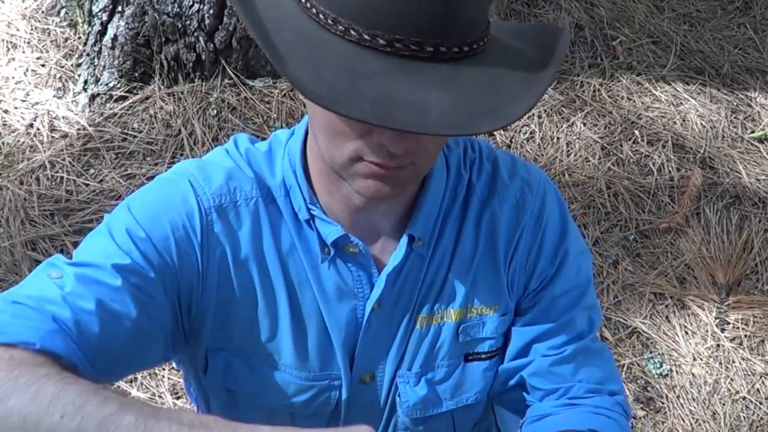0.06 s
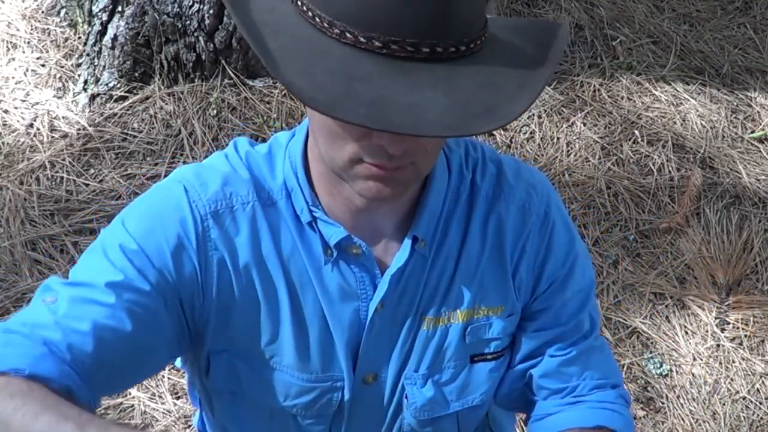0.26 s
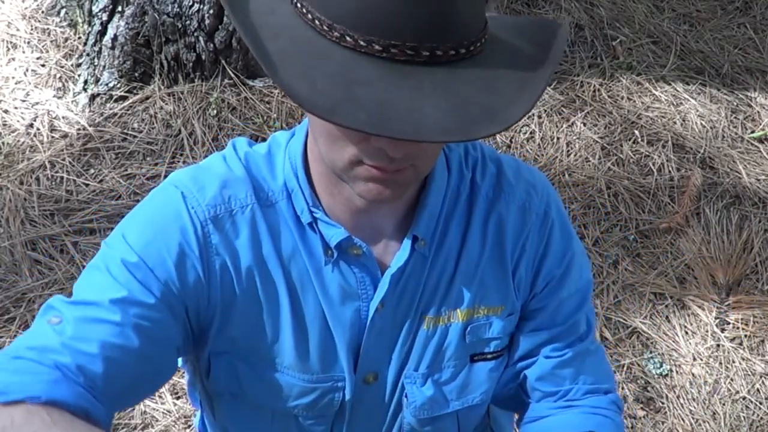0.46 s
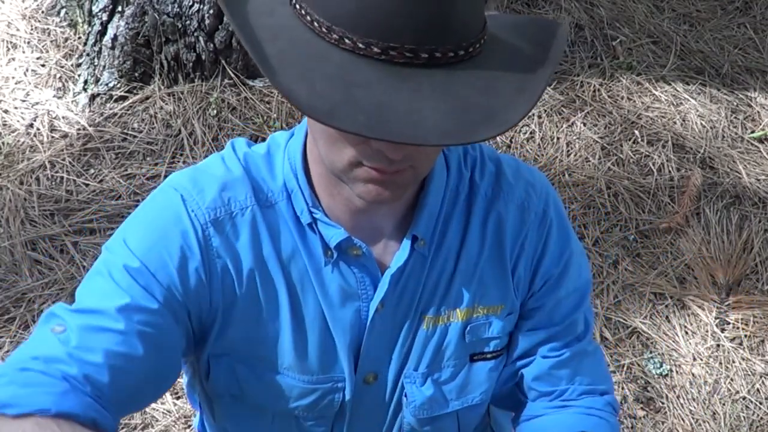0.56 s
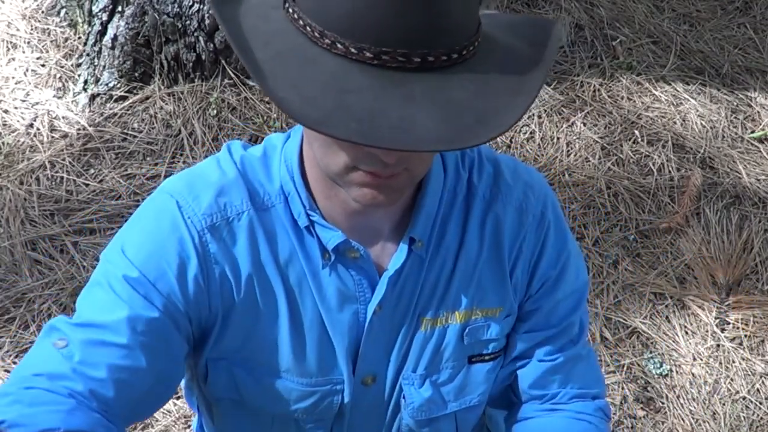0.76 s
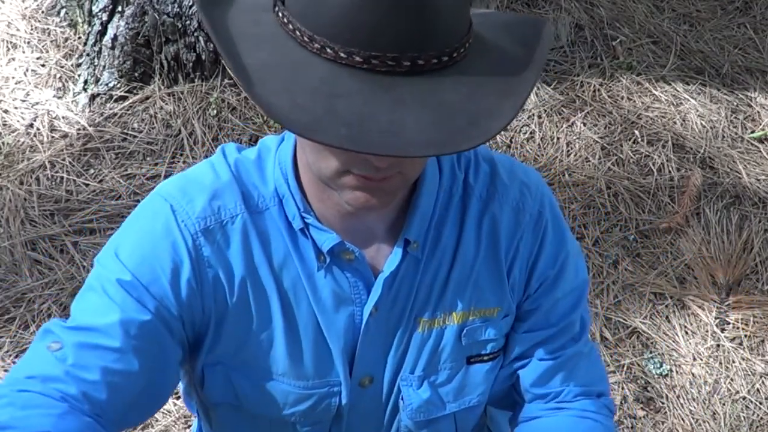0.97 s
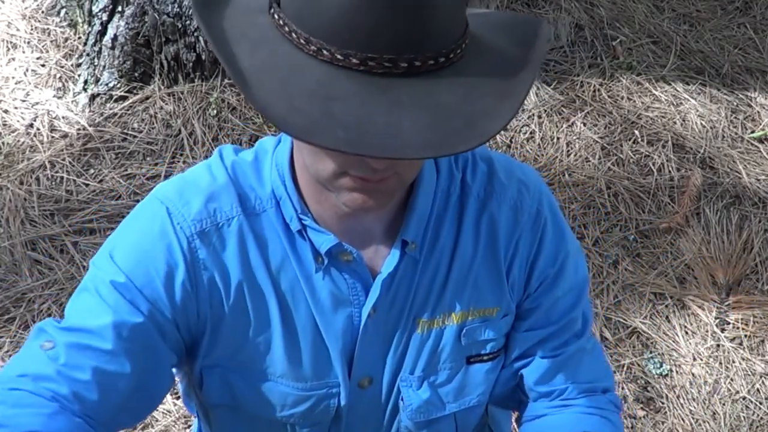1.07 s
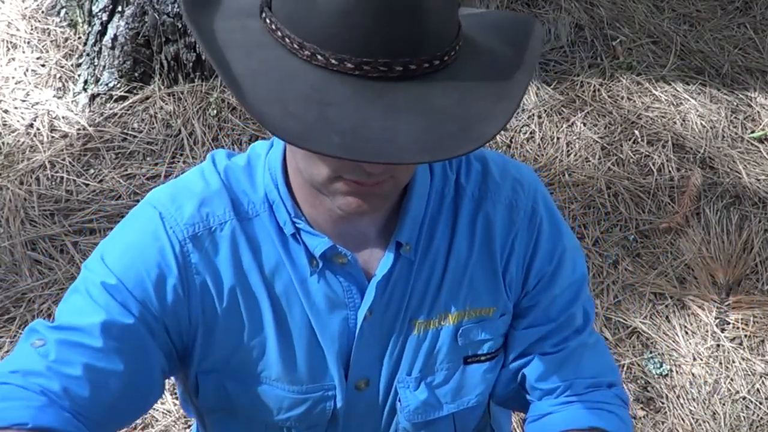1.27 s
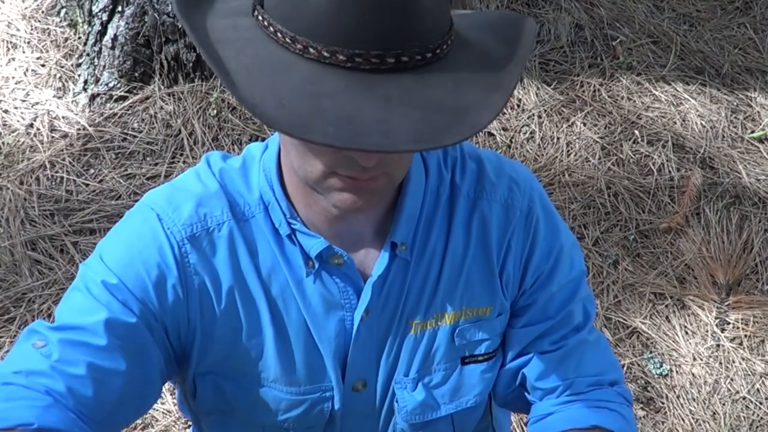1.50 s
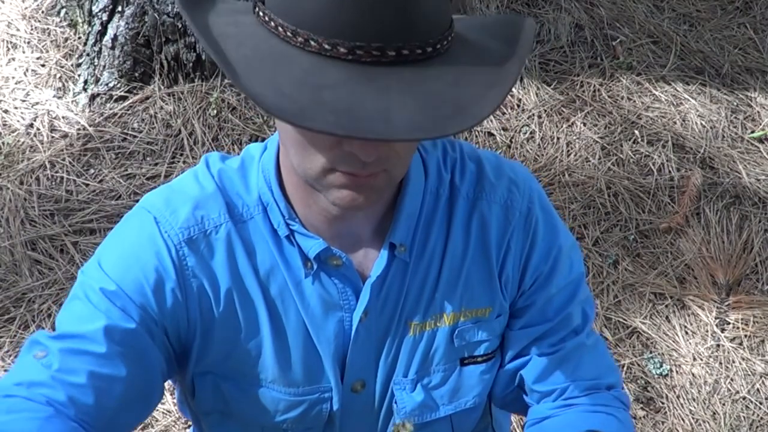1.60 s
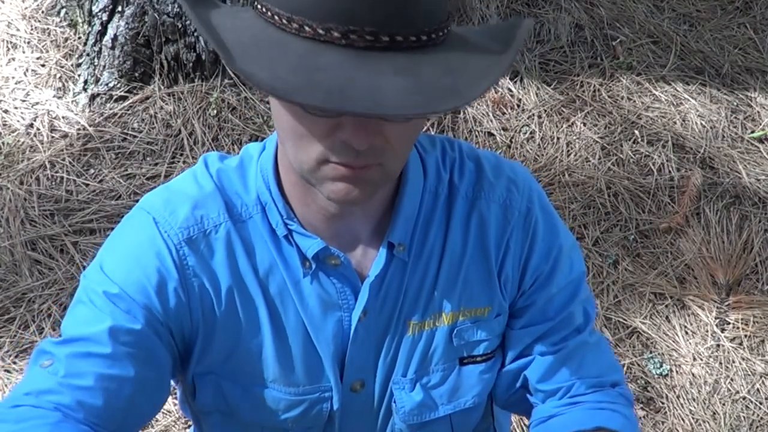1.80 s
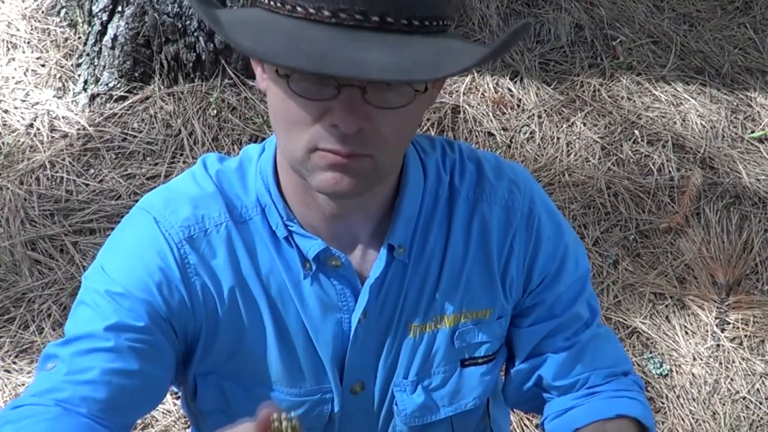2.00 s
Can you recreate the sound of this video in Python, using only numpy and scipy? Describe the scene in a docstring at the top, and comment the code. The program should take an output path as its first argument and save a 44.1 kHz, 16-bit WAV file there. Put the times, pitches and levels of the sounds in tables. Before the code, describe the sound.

Close metal hardware handling outdoors: quick bright clinks, a sharp ringing one midway, then fainter clicks and rustling of rope and sleeve, over a low airy hush with faint insect hiss and a brief distant chirp.

```python
"""Outdoors, close to a camera's stereo microphone, a brass ring and a snap hook are handled on a rope.
The ring chimes in three split pairs of decaying tones, the snap in short, mostly high tones with clicks.
Noise grains make the rustle of rope and sleeve, and short noise bursts the dull finger taps. Behind are
a low wash and two insect bands of filtered noise, a far bird's chopped tones and a thin steady line tone."""
import sys
import numpy as np
from scipy import signal
from scipy.fft import rfft, irfft
from scipy.io import wavfile
from scipy.ndimage import uniform_filter1d

SR = 44100
rng = np.random.default_rng(int(sys.argv[2]) if len(sys.argv) > 2 else 0)


def inscribe(sig):
    """Save sig as 16-bit PCM at rate SR to the path in sys.argv[1].

    A 1-D sig is mono; a 2-D sig holds one channel per row.
    Samples are clipped to [-1, 1] before scaling.
    """
    pcm = np.round(np.clip(np.atleast_2d(sig).T, -1, 1) * 32767)
    wavfile.write(sys.argv[1], SR, pcm.astype(np.int16))


def volts_from_decibels(level):
    """Turn decibel levels (scalar or array-like) into linear amplitude factors."""
    exponent = np.asarray(level, float) / 20
    return 10 ** exponent


N = 90404  # length in samples


def shape(x, points):
    """Colour a sound by (frequency [Hz], gain [dB]) points, joined along a logarithmic pitch scale."""
    hz, db = np.array(points, float).T
    bins_hz = np.fft.rfftfreq(x.shape[-1], 1 / SR)
    gain_db = np.interp(np.log(bins_hz + 1), np.log(hz), db)
    return irfft(rfft(x) * volts_from_decibels(gain_db), x.shape[-1])


def level(x, db):
    """Set the average (rms) level in dB."""
    return x * volts_from_decibels(db) / np.sqrt(np.mean(x ** 2))


def walk(rate):
    """Smooth random wandering with spread 1: noise averaged twice over 1 / rate seconds."""
    width = max(int(SR / rate), 1)
    smooth = uniform_filter1d(uniform_filter1d(rng.standard_normal(N), width), width)
    return level(smooth, 0)


def fade(t, t60, rise=0.00033):
    """A short rise for the contact time [s], then an exponential decay by 60 dB in t60 seconds."""
    return (1 - np.exp(-t / rise)) * np.exp(-np.log(1000) * t / t60)


def add(out, start_s, sound):
    """Mix a sound in at its start time, cutting off what runs past the end."""
    i = int(round(start_s * SR))
    out[i:i + len(sound)] += sound[:max(len(out) - i, 0)]


def outdoors():
    """A wide noise wash, most alike left and right in the low bass, with two wavering insect bands."""
    # colour of the wash: (frequency [Hz], gain [dB])
    wash_colour = [(20, -20), (50, -4.5), (105, -2), (340, -2), (670, -4.5), (1200, -10.5), (2000, -14),
                   (3500, -15.5), (5200, -16), (8000, -25.5), (11000, -24), (14000, -52), (16000, -59.5)]
    # its left-right difference against its shared part: (frequency [Hz], gain [dB])
    side_colour = [(25, -24), (60, -15), (125, -10), (250, -4), (500, -2.2), (1000, 2), (2000, 1.5),
                   (4000, -2), (8000, 1), (14000, -24)]
    # insect bands: (centre [Hz], half the skirt width [Hz], level of the shared part [dB], waver rate [1/s])
    insect_bands = [(2520, 130, -72, 33), (6420, 1700, -66.5, 70)]
    mid, side = shape(rng.standard_normal((2, N)), wash_colour)
    wash_gain = volts_from_decibels(-56) / np.sqrt(np.mean(mid ** 2))
    mid = wash_gain * mid
    side = wash_gain * shape(side, side_colour)
    for hz, width, db, rate in insect_bands:
        band = [(hz - 2 * width, -60), (hz, 0), (hz + 2 * width, -60)]
        parts = []
        for _ in range(2):
            hiss = shape(rng.standard_normal(N), band)
            parts.append(level(hiss * volts_from_decibels(2.04 * walk(rate)), db))
        mid = mid + parts[0]
        side = side + volts_from_decibels(1) * parts[1]
    return np.array([mid + side, mid - side]) * volts_from_decibels(0.5 * walk(2))


def chirp():
    """A far bird's buzzy whistle: two wavering strands of tone chopped into pulses."""
    # path of the whistle: (time [s], middle pitch [Hz], level before waver, chopping and placing [dB])
    notes = [(.27, 3900, -63), (0.301, 4050, -61), (0.359, 4134, -59), (.41, 4260, -59), (.44, 4150, -60),
             (.47, 4035, -62), (.52, 3950, -64), (.57, 3755, -74), (.64, 3660, -78), (.665, 3630, -70),
             (.715, 3605, -64), (.724, 3550, -90), (.726, 2520, -90), (.733, 2520, -56.5),
             (.745, 2500, -71)]
    wobble_hz, pulses_per_s, chop_depth = 80, 150, 0.73
    note_s, note_hz, note_db = np.array(notes).T
    t = np.arange(N) / SR
    pitch = np.interp(t, note_s, note_hz)
    tone = np.zeros(N)
    for offset_hz in (-79.5, 70.33):
        strand_hz = pitch + offset_hz + wobble_hz * walk(198)
        tone += np.sin(2 * np.pi * np.cumsum(strand_hz) / SR) * volts_from_decibels(3.9 * walk(50))
    pulse_rate = pulses_per_s * (1 + 0.246 * walk(43))
    chop = np.sin(np.pi * np.cumsum(pulse_rate) / SR) ** 2
    loudness = volts_from_decibels(np.interp(t, note_s, note_db, left=-120, right=-120))
    return tone * (1 - chop_depth + chop_depth * chop) * loudness


def rustle():
    """Rope fibres and cloth: dense tiny grains of noise whose level follows the hands."""
    # how strongly the hands rub, before the trim and waver below: (time [s], level [dB])
    rubbing = [(0, -57.5), (.05, -51.5), (.07, -57.5), (.095, -45.5), (.11, -54), (.16, -54), (.19, -48),
               (.23, -42.5), (.26, -47.5), (.295, -55), (0.311, -38), (.325, -46), (.37, -55.5), (.42, -53),
               (.47, -53.5), (.56, -48.5), (.62, -50.5), (.8, -58.5), (.87, -56), (.93, -57), (1.1, -57),
               (1.3, -60), (1.42, -49.5), (1.48, -49), (1.53, -54.5), (1.58, -48), (1.61, -54),
               (1.64, -47.5), (1.7, -49), (1.75, -52.5), (1.78, -52), (1.83, -47.5), (1.9, -60),
               (1.97, -55), (2.01, -52), (2.05, -56.5)]
    # colour of the grains: (frequency [Hz], gain [dB])
    grain_colour = [(800, -40), (3000, -13), (6000, -14.5), (8000, -5), (9500, -2), (11600, -4),
                    (13500, -8), (16000, -12)]
    grains_per_s, spread_db, trim_db = 22000, 1.65, -1.5
    timing, strength = rng.random((N, 2)).T
    present = timing < grains_per_s / SR
    # many weak grains and a few strong ones
    grains = present * volts_from_decibels(-spread_db * np.log(strength + 1e-9)) * rng.standard_normal(N)
    rub_s, rub_db = np.array(rubbing).T
    hands_db = np.interp(np.arange(N) / SR, rub_s, rub_db) + 1.2 * walk(60)
    return level(shape(grains, grain_colour), trim_db) * volts_from_decibels(hands_db)


def finger_taps():
    """Dull taps of fingers on rope and cloth: each is a short burst of noise around its centre."""
    # taps: (time [s], level before the fade [dB], centre [Hz], decay time t60 [s])
    taps = [(.1165, -45, 4000, .01), (0.1429, -33.5, 4800, 0.013), (0.208, -42.5, 400, 0.038),
            (.2078, -46.5, 1500, 0.023), (.2080, -36, 3540, 0.018), (.2695, -32, 3960, 0.013),
            (0.4825, -37, 4500, .012), (0.9781, -39, 4800, .012), (1.0117, -40.5, 3800, 0.0084),
            (1.0527, -36.5, 3470, .012), (1.06, -42, 3040, .015), (1.3800, -39, 3040, 0.0076),
            (1.3960, -41, 3800, 0.015), (1.4439, -45.5, 1200, 0.013), (1.5030, -41, 3550, 0.011),
            (1.5585, -45, 3300, .015), (1.5650, -44.5, 2300, 0.016), (1.5718, -45, 3500, 0.014),
            (1.9412, -37.5, 3980, .008), (1.9615, -49, 4500, .008)]
    skirt_db = -19.5  # gain an octave off the centre
    out, t = np.zeros(N), np.arange(SR // 15) / SR
    for start_s, db, hz, t60 in taps:
        band = [(hz / 4, 1.9 * skirt_db), (hz / 2, skirt_db), (hz, 0),
                (hz * 2, skirt_db), (hz * 4, 3 * skirt_db)]
        body = shape(rng.standard_normal(len(t)), band)
        add(out, start_s, level(body, db) * fade(t, t60))
    return out


def grip(time_s):
    """Fingers holding the snap shorten its ringing: the factor on its decay times at a moment."""
    # how freely the snap hangs: (time [s], factor on the decay time [1])
    freedom = [(.1, 1.06), (.2, 0.38), (.23, 0.88), (.27, 0.74), (.35, .6), (.48, 0.81), (.62, 1.13),
               (.84, .9), (.98, 1.1), (1.01, 1.08), (1.05, 0.82), (1.4, 0.42), (1.45, 0.85), (1.5, 0.45),
               (2, 0.36)]
    return np.interp(time_s, *np.array(freedom).T)


def snap():
    """Each knock rings the modes near its own centre and makes a short noisy contact click."""
    # ways the snap hook rings: (frequency [Hz], relative level [dB], t60 before the grip factor [s])
    snap_modes = [(2000, -7.5, 0.017), (3450, -10, .01), (4920, 4.5, 0.018), (6900, -14, 0.03),
                  (8300, -3, 0.054), (8800, -7, 0.017), (9200, 1.5, 0.029), (9720, 1.5, 0.028),
                  (9790, -1, 0.033), (10400, 0, 0.028), (11060, 2, 0.036), (12200, -1, 0.034),
                  (12690, -4, 0.039), (13800, 0, 0.051), (15500, -16, .028), (14970, 10, 0.011)]
    # knocks: (time [s], ringing [dB], centre of the ringing [Hz], spread [Hz], click before colouring [dB])
    knocks = [(.0300, -59, 9000, 2000, -44.5), (0.1426, -32, 9970, 900, -32.5),
              (0.166, -49, 9500, 2000, -46), (.1955, -44, 11000, 2000, -41), (0.2063, -44, 9200, 3000, -23),
              (.2100, -31.5, 12200, 2500, -20), (0.218, -36, 10600, 2000, -33.5),
              (0.222, -27, 10500, 2000, -25), (.2690, -25, 11600, 2520, -22.5),
              (0.2837, -50, 9500, 2000, -37), (.2980, -52, 10000, 2000, -35), (0.325, -44, 5060, 800, -47),
              (0.3516, -26.5, 8800, 1490, -27.5), (.4760, -40, 9200, 400, -54),
              (0.4817, -17, 9660, 603, -24.5), (.4860, -30.5, 10160, 1500, -37),
              (.5695, -47, 9900, 800, -40), (0.619, -27.5, 10600, 2500, -23), (.6202, -29, 2016, 400, -48),
              (0.627, -36, 11200, 2000, -29), (.6515, -38, 9800, 600, -48), (.6615, -41, 8800, 990, -36),
              (0.831, -30, 9600, 1200, -33), (0.8382, -37, 11500, 2500, -26),
              (.8560, -38.5, 8900, 800, -52), (.9382, -53, 12000, 2000, -45), (0.962, -53, 9700, 600, -42),
              (.9740, -43, 9400, 2000, -36), (0.9776, -27.5, 9650, 1500, -30), (.9830, -28, 9700, 400, -33),
              (.9835, -36, 14200, 500, -50), (0.988, -41, 9700, 1500, -24.5),
              (1.0126, -11, 12540, 220, -17.5), (1.0125, -21.5, 15460, 350, -25),
              (1.045, -32, 10300, 800, -54), (1.0524, -23, 10400, 900, -23), (1.061, -45, 9500, 2000, -29),
              (1.3650, -67, 10000, 2000, -42), (1.3792, -44, 8300, 2020, -27),
              (1.3955, -43, 8300, 2550, -31.5), (1.4439, -44, 11200, 500, -34),
              (1.4510, -30.5, 11100, 400, -38), (1.4507, -37.5, 9200, 500, -46),
              (1.4724, -40, 4950, 500, -34), (1.5019, -33, 10550, 2000, -33),
              (1.5510, -54, 10400, 1500, -50), (1.5595, -40.5, 12200, 800, -34),
              (1.5655, -56, 9000, 1500, -50), (1.5716, -41, 9500, 1200, -39), (1.573, -42, 9500, 1200, -42),
              (1.6255, -51, 9450, 2000, -41), (1.6440, -43, 9600, 1000, -40), (1.9415, -45, 9800, 700, -46),
              (1.9618, -46.5, 9100, 1500, -35), (1.9995, -47, 8400, 800, -56),
              (2.0470, -44.5, 9500, 1500, -46)]
    # colour of the contact click: (frequency [Hz], gain [dB])
    click_colour = [(300, -39), (1500, -15.5), (3500, -5.5), (7000, 1.5), (10000, 0), (13000, -4),
                    (16000, -13)]
    scatter_db, detune = 1.5, 0.0046  # random spread of mode levels, and of pitch as a share
    focus_db = 8  # clicks are lifted near the knock's centre
    click_t60_s, click_rise_s = 0.0022, 0.00008
    tail_db, tail_t60_s = -2.5, 0.025  # longer end of the click, before the grip factor
    out, t = np.zeros(N), np.arange(SR // 12) / SR
    hz, mode_db, t60 = np.array(snap_modes).T[:, :, None]
    for start_s, db, centre, spread, click_db in knocks:
        loud_chance, pitch_chance, sign_chance = rng.standard_normal((3, len(hz), 1))
        nearness = np.exp(-0.5 * ((hz - centre) / spread) ** 2)
        strength = volts_from_decibels(db + mode_db + scatter_db * loud_chance) * np.sign(sign_chance) * nearness
        free = grip(start_s)
        tones = np.sin(2 * np.pi * hz * (1 + detune * pitch_chance) * t)
        ringing = np.sum(strength * tones * fade(t, t60 * free), axis=0)
        focus = [(centre * 0.76, 0), (centre, focus_db), (centre * 1.3, 0)]
        hiss = shape(shape(rng.standard_normal(len(t)), click_colour), focus)
        click_fade = fade(t, click_t60_s, click_rise_s) + volts_from_decibels(tail_db) * fade(t, tail_t60_s * free)
        add(out, start_s, ringing + volts_from_decibels(click_db) * hiss * click_fade)
    return out


def ring():
    """Each blow shares itself between the partners of every pair by where it lands; fingers damp it."""
    # split pairs: (frequency [Hz], partner frequency [Hz], t60 before each blow's factor [s],
    #   level of the faint longer after-ring against the first ring [dB])
    mode_pairs = [(2165, 2225, 0.029, -25), (5947, 6130, 0.044, -27.5), (11225, 11410, 0.051, -36)]
    # blows: (time [s], low pair [dB], middle pair [dB], high pair [dB],
    #   strike angle [rad]: cosine to one partner, sine to the other, factor on the decay time [1])
    blows = [(0.2111, -70, -63, -24.5, 0.2, 0.97), (.6200, -40.5, -20.5, -10, -0.15, 0.82),
             (0.6214, -46, -23, -7, -0.17, .9), (0.633, -45, -29, -34, 1.1, 1.1),
             (0.8318, -32, -26, -29, 1.67, 1.01), (.8945, -64, -47, -60, 1.3, 0.74),
             (0.9386, -48, -36.5, -52, 1.04, .8), (0.967, -49, -41, -55, 1.1, 0.87),
             (0.9774, -37, -21.5, -46, 1.36, 0.45), (.9840, -45, -39, -28, -0.19, 0.86),
             (1.0116, -35.5, -17.5, -23.5, 1.16, 0.93), (1.0152, -34, -28.5, -25, -0.2, 0.94),
             (1.3799, -45, -29, -19.5, 0.39, 0.68), (1.4510, -64, -42.5, -60, -0.13, 1)]
    rough_db, rough_per_s = 1.16, 380  # the loose parts make the ringing waver
    detune = 0.0023  # random spread of pitch as a share
    after_t60_s, after_waver_per_s = 0.3, 540
    out, t = np.zeros(N), np.arange(SR // 3) / SR
    for m, (hz, partner_hz, t60, after_db) in enumerate(mode_pairs):
        first, after = np.zeros(N), np.zeros(N)
        for start_s, *pair_dbs, angle, free in blows:
            pitch = 1 + detune * rng.standard_normal()
            one = np.cos(angle) * np.sin(2 * np.pi * hz * pitch * t)
            other = np.sin(angle) * np.sin(2 * np.pi * partner_hz * pitch * t)
            pair = volts_from_decibels(pair_dbs[m]) * (one + other)
            add(first, start_s, pair * fade(t, t60 * free))
            add(after, start_s, pair * volts_from_decibels(after_db) * fade(t, after_t60_s))
        out += first * volts_from_decibels(rough_db * walk(rough_per_s))
        out += after * (volts_from_decibels(-3) + walk(after_waver_per_s))
    return out


def ground_return(near):
    """Sound scattered back from ground and body: a brief noise echo, unlike left and right."""
    return_db, t60_s, rise_s = -22, 0.0094, 0.00071
    t = np.arange(SR // 40) / SR
    scatter = rng.standard_normal((2, len(t))) * fade(t, t60_s, rise_s)
    scatter *= volts_from_decibels(return_db) / np.sqrt(np.sum(scatter ** 2, axis=1, keepdims=True))
    return np.array([signal.fftconvolve(near, echo)[:N] for echo in scatter])


def scene():
    """Hands and hardware in the centre with their scattered return, the outdoors around them."""
    near = ring() + snap() + finger_taps() + rustle()
    bird = chirp()
    bird_stereo = np.array([bird * volts_from_decibels(5.5), bird * volts_from_decibels(3.0)])  # a little to the left
    return near + ground_return(near) + bird_stereo + outdoors()


def band_limit(x):
    """A steep low-pass at the top of the band."""
    return signal.sosfilt(signal.butter(12, 16470, fs=SR, output="sos"), x)


def record(dry):
    """The camera adds its line tone, ducks its gain on loud clinks and cuts the top."""
    duck_above_db, duck_ratio, release_s = -23, 3, 0.025
    line_hz, line_db, top_hz = 15734, -69, 16000  # tone level is before ducking and the top cut
    memory = np.exp(-1 / (release_s * SR))
    power = signal.lfilter([1 - memory], [1, -memory], np.mean(dry ** 2, axis=0))
    loudness = np.sqrt(power)
    gain = np.minimum(volts_from_decibels(duck_above_db) / (loudness + 1e-9), 1) ** (1 - 1 / duck_ratio)
    tone = np.sqrt(2) * volts_from_decibels(line_db) * np.sin(2 * np.pi * line_hz * np.arange(N) / SR)
    top_cut = signal.ellip(8, 0.2, 60, top_hz, fs=SR, output="sos")
    mix = signal.sosfilt(top_cut, (dry + tone) * gain)
    return band_limit(mix)


dry = scene()
out = record(dry)
inscribe(out)
```